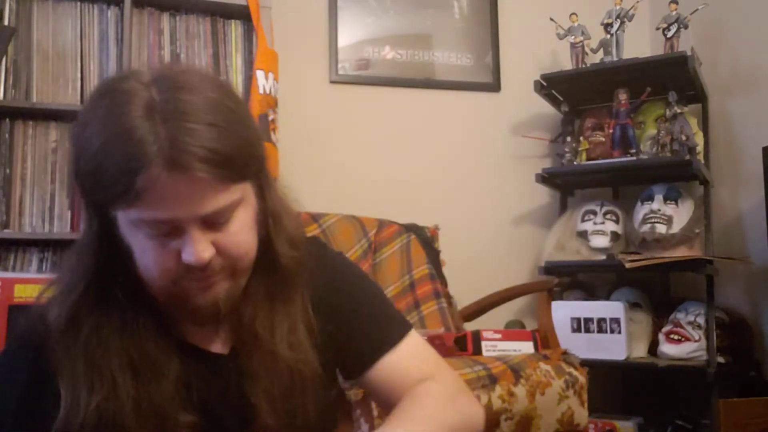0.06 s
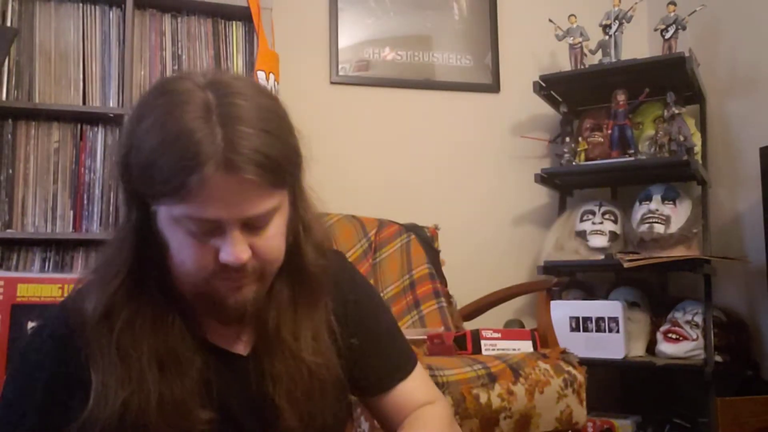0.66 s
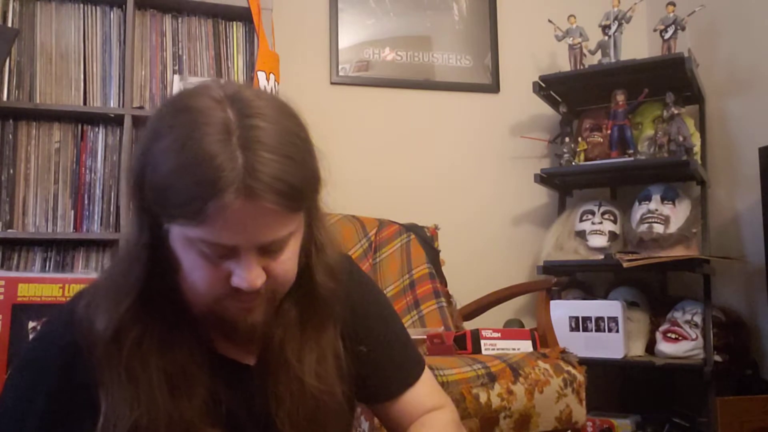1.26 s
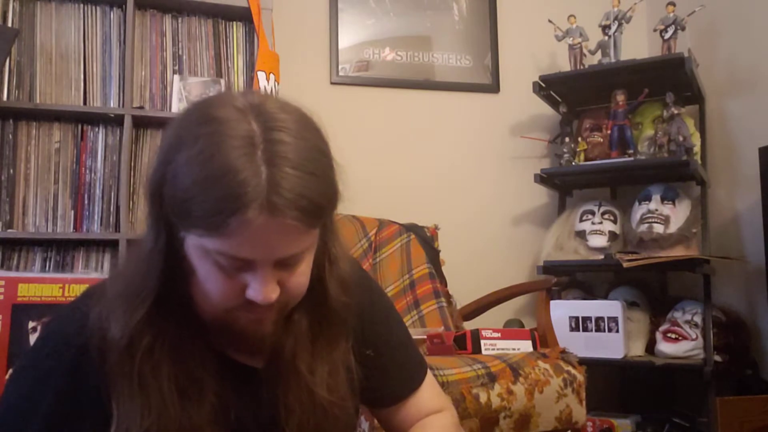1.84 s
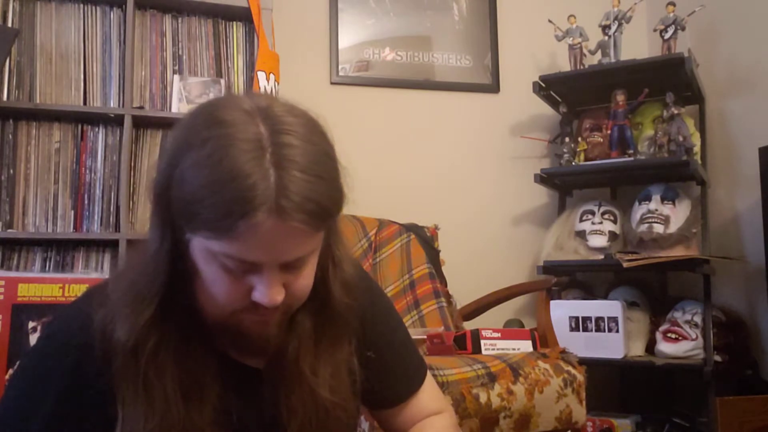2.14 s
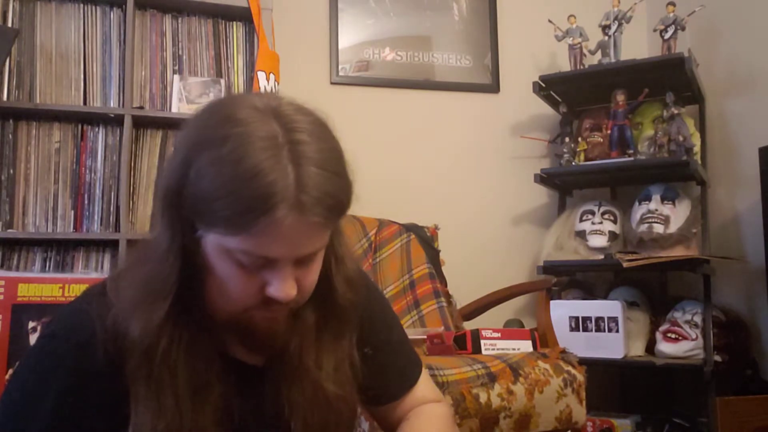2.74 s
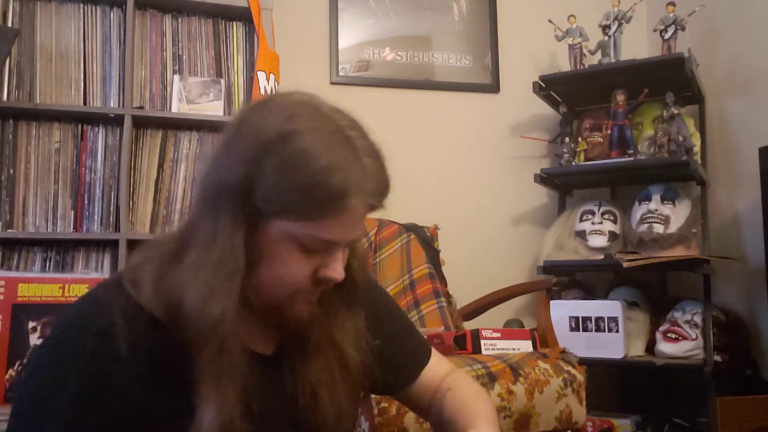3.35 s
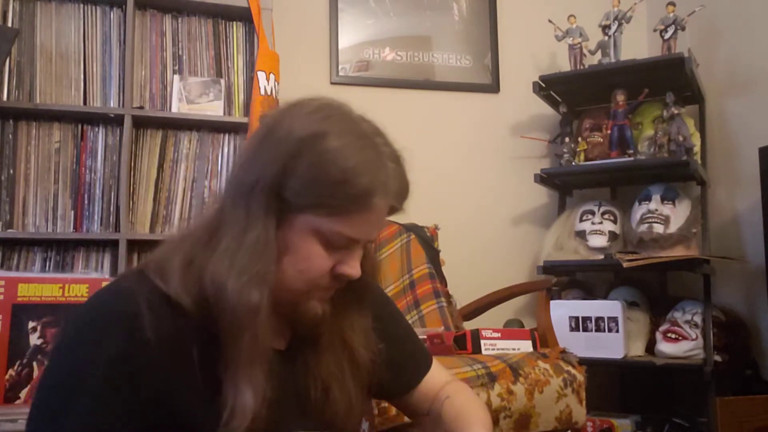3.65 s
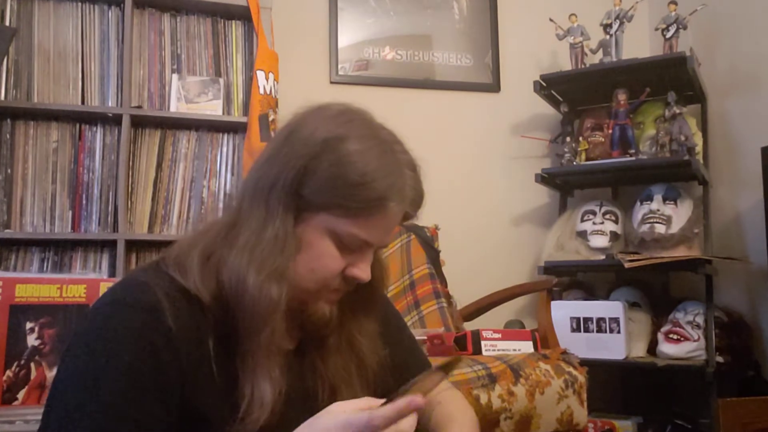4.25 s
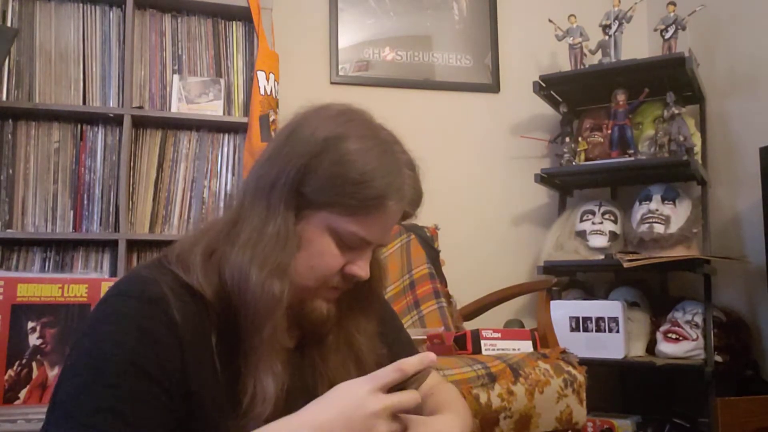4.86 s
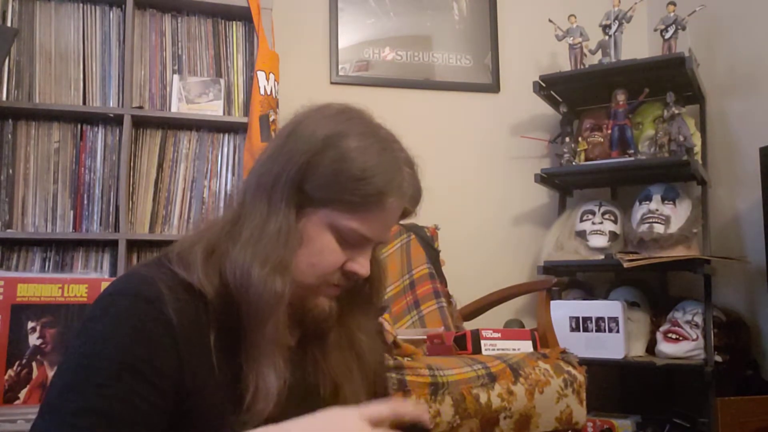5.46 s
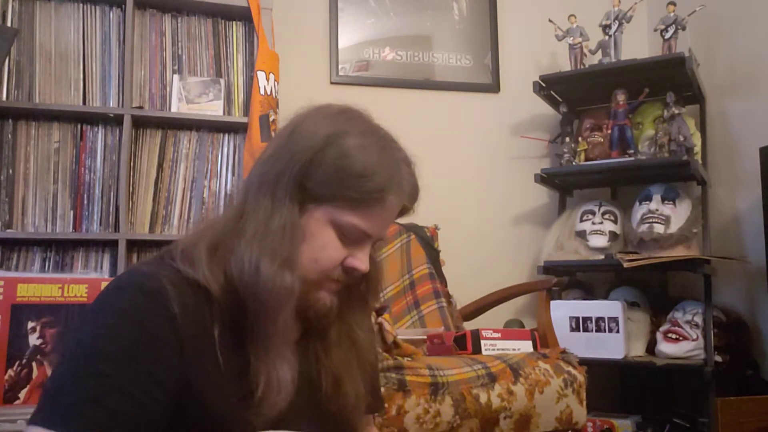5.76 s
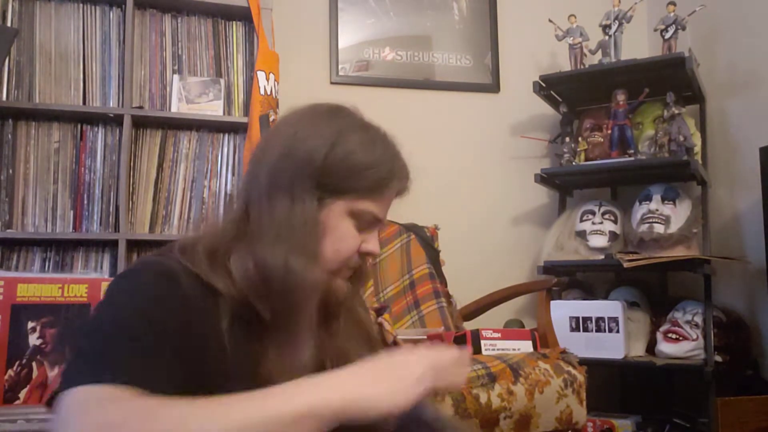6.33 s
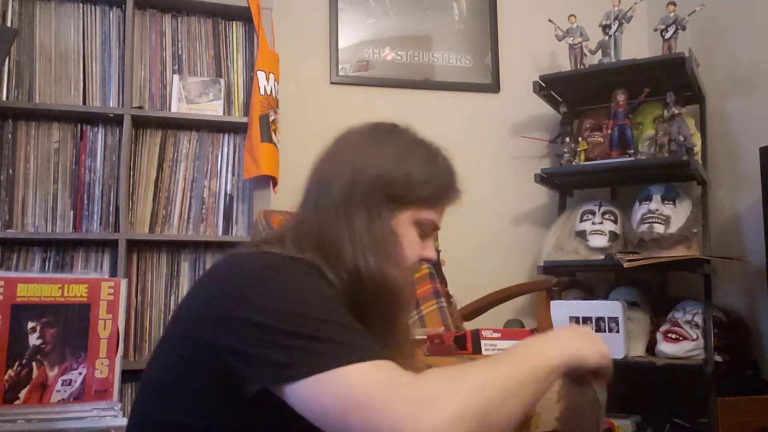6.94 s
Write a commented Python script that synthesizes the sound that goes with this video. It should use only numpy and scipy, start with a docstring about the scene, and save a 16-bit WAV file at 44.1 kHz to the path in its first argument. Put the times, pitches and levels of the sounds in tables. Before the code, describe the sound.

Paper rubs quietly near the microphone as a small vinyl disc slips from its sleeve, while a muffled engine drones outside and fades. Scattered snaps and taps follow, each with a short room echo. The disc gives its loudest click as a second engine approaches. Denser rustling ends the handling while that engine drops to a low idle, over steady rumble and faint hiss.

```python
"""A small vinyl record is slid out of its paper sleeve in a living room, with traffic behind the wall.
First the paper rubs and the disc glides out, while an engine drones and fades by 2 s.
Then fingers turn the disc: paper crinkles, the rim sings faintly and the near walls echo each tick.
From 4 s a second engine comes near, and the disc gives its loudest knock.
Last, the disc is laid aside in a run of rustles while that engine settles to idle."""
import sys
import numpy as np
from scipy import signal
from scipy.fft import rfft, irfft, next_fast_len
from scipy.io import wavfile
from scipy.ndimage import map_coordinates

SR = 44100
rng = np.random.default_rng(int(sys.argv[2]) if len(sys.argv) > 2 else 0)


def to_wav(s):
    """Save 16-bit WAV."""
    ch = np.atleast_2d(s).T  # columns
    pcm = np.round(np.clip(ch, -1, 1) * 32767)  # PCM
    wavfile.write(sys.argv[1], SR, pcm.astype(np.int16))


N = 308700  # 7 s

# Tone colours, that is, how strong each pitch is: pitch_hz, level_db
RUMBLE_TONE = [(20, -27.5), (35, -20.5), (48, -13.5), (59, 5), (70, -6), (85, -7), (105, -6), (135, -13.5),
               (165, -30), (210, -15), (300, -57.5)]
TYRE_TONE = [(130, -9), (180, -3), (215, -2), (232, 1), (250, 6.5), (280, -7), (350, -3.5), (450, -11.5),
             (540, -9.5), (590, -9), (650, -14.5), (750, -21), (1100, -25), (2000, -46)]
HISS_TONE = [(150, -3), (300, 18), (450, -6.5), (700, -0.5), (1200, -6), (2500, -6.5), (4000, -9.5),
             (5200, -3.5), (6800, 1), (7600, -3.5), (8400, -21), (10000, -17), (12000, -9), (15800, -9)]
PAPER_TONE = [(260, -61), (450, -3), (624, 2.5), (1070, -4.5), (1220, -12.5), (1370, -6), (1880, -10.5),
              (2090, -9.5), (2770, -3.5), (3310, -4), (4870, 0.5), (6370, 0), (8710, -11), (14200, -7.5),
              (15800, -12)]
HOLLOW_TONE = [(200, -9), (450, 3), (720, 13.5), (1000, -20), (1400, 3.5), (2000, -51), (4000, -12)]  # the sleeve's belly
SNAP_TONE = [(80, -39), (200, 1), (300, -2.5), (440, -4.5), (650, -3), (950, -7), (1500, -2.5), (2800, -4),
             (5000, 3), (6500, 2.5), (8500, -5.5), (12000, -7), (16000, -14)]
# Vehicles going by: nearest_s, half_width_s, tyre_db
PASSES = [(.85, 1.107, -62), (5.5, 0.61, -60.5)]
# The engine that fades: time_s, firing_hz, level_db
FIRST_ENGINE = [(0.0, 101.6, -41.5), (0.13, 101.5, -41.5), (0.27, 101.5, -38.5), (0.436, 101.5, -45),
                (1.016, 101.6, -48.5), (1.262, 103.4, -55.5), (1.332, 102.9, -62.5), (1.658, 103.1, -57),
                (1.8, 101.5, -77)]
# Its higher tones: times_firing_rate, relative_db
OVERTONES = [(2.489, -4.5), (3.48, -9.5), (5.8, -12.5)]
# The engine that comes near: time_s, lowest_tone_db, third_harmonic_db
SECOND_ENGINE = [(3.9, -80, -74.5), (4.11, -57, -60.5), (5.04, -60.5, -62.5), (5.23, -43, -58),
                 (5.66, -40, -59), (5.89, -54.5, -64), (5.97, -46.5, -64.5), (6.17, -42.5, -63),
                 (6.32, -43, -86), (6.44, -41.5, -69), (6.94, -44, -92), (7.0, -51, -77)]
# Echoes off the near walls: delay_s, left_gain, right_gain
WALL_ECHOES = [(.0035, .25, .1), (.0088, 0.38, -.3), (.0132, 0.074, .2), (.0136, 0.062, .35),
               (.024, .2, -.2)]
# How long the room takes to fade by 60 dB: pitch_hz, fade_s
ROOM_FADE = [(200, 0.28), (800, 0.22), (2000, 0.31), (5500, 0.28), (14000, 0.25)]
# Extra leftward lean of the handling sounds: pitch_hz, left_minus_right_db
LEFT_LEAN = [(500, -0.2), (2000, 2.2), (4000, -1.3), (8000, 3), (12000, -1.5)]
# Where disc and sleeve ring together: pitch_hz, width_hz, strength_db
RESONANCES = [(675, 270, -2), (1050, 120, -6), (1390, 91, -7.5), (2150, 320, -5.5), (2754, 420, 1.5),
              (3590, 250, -5), (4480, 2000, -9.5), (5050, 1700, -15.5)]
# Paper rubbing paper: start_s, attack_s, length_s, level_db, top_relative_db, body_relative_db
STROKES = [(0.108, 0.067, 0.081, -72.5, 16.5, -4), (0.242, 0.03, 0.054, -65, 2, -16),
           (.775, 0.062, 0.16, -68, 1, -12), (0.935, .06, 0.23, -77, -1, -3),
           (1.254, 0.028, 0.074, -64, -7, 4.5), (1.325, 0.072, 0.29, -68, -14, -2),
           (2.305, 0.014, 0.049, -65.5, -6, 0.5), (2.372, 0.063, 0.19, -71, 5, -13),
           (2.535, 0.048, 0.094, -60.5, -4, -5), (2.638, 0.025, 0.24, -72, 3, -12),
           (3.002, 0.041, 0.074, -61, -2.5, -6), (3.113, .06, 0.1, -71, 1, -7.5),
           (3.283, .012, 0.036, -58.5, 1, -39), (3.388, 0.059, 0.074, -60, 3.5, -2.5),
           (4.03, .025, .04, -75, -2, -2), (4.228, 0.027, 0.085, -66, -8, 2),
           (4.368, .05, 0.12, -64, -3, -10), (4.57, 0.048, 0.27, -78.5, -5, -5),
           (4.808, 0.064, 0.1, -67, -6.5, -0.5), (5.06, 0.11, 0.19, -64, -2.5, -0.5),
           (5.239, 0.071, 0.075, -53.5, 1, -4), (5.404, 0.047, 0.11, -58, 6, -11),
           (5.503, 0.069, 0.12, -53, 2.5, -12), (5.617, 0.047, 0.14, -54.5, -0.5, -3.5),
           (5.717, 0.076, 0.098, -50, 5, -14.5), (5.809, 0.028, 0.029, -56, 1, 1),
           (5.86, 0.035, 0.11, -62.5, 2.5, -8.5), (5.968, 0.045, 0.069, -52, 4.5, -14),
           (6.029, .03, 0.037, -59, -17, -1.5), (6.111, 0.047, 0.071, -66, 4, -10),
           (6.355, 0.032, 0.064, -60.5, -1, -9.5), (6.417, 0.039, 0.048, -54, -3.5, -4),
           (6.464, .04, 0.044, -50.5, -4.5, -5), (6.512, .04, 0.045, -63.5, 6.5, -16),
           (6.63, .06, 0.11, -76, 1, -5)]
# Rubs in the sleeve's pocket: a hand scuffs the sleeve near 0.2 s, then the disc slides along it twice: #
# start_s, attack_s, length_s, release_s, level_db, first_hz, last_hz, hollow_relative_db
GLIDES = [(0.204, 0.071, 0.14, 0.083, -64, 1940, 2140, -9),
          (0.962, 0.42, 0.45, 0.25, -61.5, 5670, 3570, -6.5),
          (5.43, .04, .21, 0.084, -59.5, 3900, 2270, -8.5)]
# The rim rubbing the paper: start_s, length_s, level_db
RIM_RUBS = [(2.614, 0.19, -73.5), (3.004, 0.06, -67.5)]
# Paper snaps and disc taps: time_s, level_db, pitch_hz, knock_relative_db, top_relative_db, room_db
CONTACTS = [(.589, -28.5, 4900, -17.5, -1, 0), (0.5931, -24.5, 7200, -28, -1, 4.5),
            (0.795, -35, 6200, -17, -11, 4), (.9769, -29, 5800, -23, -17, 6),
            (1.0482, -25.5, 5900, -42, -21, 5), (1.4511, -26, 3800, -6, -36, 3),
            (1.7796, -33, 5884, -6, -1, 3), (2.324, -35, 6400, -3.5, -29, 1.5),
            (2.4285, -32.5, 3230, -10, -6, 5), (2.548, -29, 6200, -11, -15, 4),
            (2.5678, -27.5, 6100, -3.5, -2.5, 1.5), (2.591, -32.5, 5615, 1, -3, 8),
            (2.6709, -29, 4770, -13, -9, -2), (3.036, -26.5, 6800, -7.5, -6, 7),
            (3.2809, -25, 5200, -16, -2, 5), (3.2874, -26, 4770, -16.5, -2.5, 8),
            (3.3937, -24.5, 4330, -29, -5.5, 2), (3.4014, -31, 4200, -3, -9, 9),
            (3.454, -21.5, 3640, -5, -4, -2), (3.64, -40.5, 5350, -4.5, -17, 4.5),
            (4.051, -34.5, 4800, -9.5, 2.5, 13), (4.2247, -24, 5100, -4.5, -4.5, 7.5),
            (4.3392, -14.5, 3600, -4.5, -11.5, 5), (4.3514, -17, 4400, -9, -22, 1),
            (4.362, -26.5, 2800, -19, -16, -5), (4.5227, -22.5, 3600, 1, -18, 9),
            (4.532, -28.5, 1100, 2.5, -21, 5), (5.1146, -34, 1300, 12, -22, 8),
            (5.125, -36.5, 700, 9, -12, 1), (5.3209, -20.5, 3580, -9, -2, 6),
            (5.3788, -29.5, 3800, -1, -6, 3), (6.3525, -43.5, 2780, 1, -4, 0)]

STROKE_FALL_S = 0.048  # a rub fades by 20 dB in this time
TIME_S = np.arange(N) / SR


def amp(db):
    """Turn decibels into a gain."""
    return 10 ** (np.asarray(db) / 20)


def unit(x):
    """Scale a sound to an average power of 1."""
    return x / np.sqrt(np.mean(x ** 2) + 1e-20)


def along(points, hz):
    """Look up a table's value at any pitch."""
    pitches, values = np.transpose(points)
    return np.interp(np.log(hz + 1), np.log(pitches + 1), values)


def curves(rows):
    """Turn each column after the time into one value per sample."""
    times, *columns = np.transpose(rows)
    return [np.interp(TIME_S, times, column) for column in columns]


def wobble(rate):
    """A smooth curve through `rate` random points a second."""
    return map_coordinates(rng.standard_normal(int(N * rate / SR) + 4), [TIME_S * rate])


def filtered(x, response):
    """Colour a sound with the gain that `response` gives each pitch."""
    size = next_fast_len(N + 8192)
    return irfft(rfft(x, size) * response(np.fft.rfftfreq(size, 1 / SR)), size)[..., :N]


def registers(hz, edges):
    """Split the pitches softly into bands below, between and above the edges."""
    below = [1 / (1 + (hz / edge) ** 12) for edge in edges]
    return np.diff([0 * hz, *below, 1 + 0 * hz], axis=0)


def panned(x, left_db):
    """Tip a sound towards the left."""
    return x * amp(np.array([[.5], [-.5]]) * left_db)


def spread(mid, side, hz, wide_hz=430):
    """Sound from all around: left and right are alike in the bass, unrelated in the treble."""
    side = side * hz / np.hypot(hz, wide_hz)
    return np.array([mid + side, mid - side])


def noise(tone, left_db):
    """Wide stereo noise with a given tone colour."""
    hz = np.fft.rfftfreq(N, 1 / SR)
    pair = spread(*rfft(rng.standard_normal((2, N))), hz) * amp(along(tone, hz))
    return unit(panned(irfft(pair, N), left_db))


def passing(nearest_s, half_width_s, db):
    """A vehicle swells as it comes near and fades behind the houses."""
    return amp(db) / (1 + np.abs((TIME_S - nearest_s) / half_width_s) ** 2.9)


def earshot(rows, fade_s=.25):
    """An engine fades in before its first row and out after its last."""
    outside_s = np.abs(TIME_S - np.clip(TIME_S, rows[0][0], rows[-1][0]))
    return amp(-20 * outside_s / fade_s)


def background():
    """Street rumble grows with engines and traffic; muffled tyres pass over a faint, steady hiss."""
    traffic = np.sqrt(sum(passing(*vehicle) ** 2 for vehicle in PASSES))
    effort = earshot(FIRST_ENGINE) * amp(curves(FIRST_ENGINE)[1])
    effort += earshot(SECOND_ENGINE) * amp(curves(SECOND_ENGINE)[0])
    steady, moving = amp(-58.5), amp(0.5) * np.sqrt(effort * traffic)
    rumble = np.hypot(steady, moving) * noise(RUMBLE_TONE, left_db=4.5)
    tyres = traffic * amp(1.5 * wobble(6)) * noise(TYRE_TONE, left_db=3.5)
    return rumble + tyres + amp(-73.5) * noise(HISS_TONE, left_db=5.5)


def firing_phase(hz):
    """One turn per engine firing, at a slightly unsteady rate."""
    return 2 * np.pi * (np.cumsum(hz * (1 + .003 * wobble(8))) / SR + rng.random())


def hum(phase, db, waver_db):
    """One engine tone, wavering as the vehicle moves."""
    return np.sqrt(2) * np.sin(phase) * amp(db + waver_db * wobble(14))


def first_engine():
    """A low drone passes the wall; higher tones swell with the first vehicle's tyres."""
    firing_hz, db = curves(FIRST_ENGINE)
    phase = firing_phase(firing_hz)
    drone = earshot(FIRST_ENGINE) * hum(phase, db, waver_db=1.0)
    for multiple, relative_db in OVERTONES:
        overtone = hum(multiple * phase + 0.9 * wobble(12), relative_db - 2.5, waver_db=3.0)
        drone += passing(*PASSES[0]) * overtone
    return panned(drone, left_db=2.1)


def second_engine(cruise_hz=70.75, idle_hz=60.05, slows_at_s=5.7, slowing_s=0.1223):
    """An engine drops to idle; only its three lowest harmonics pass the wall."""
    db, third_db = curves(SECOND_ENGINE)
    firing_hz = idle_hz + (cruise_hz - idle_hz) / (1 + np.exp((TIME_S - slows_at_s) / slowing_s))
    phase = firing_phase(firing_hz)
    drone = hum(phase, db, waver_db=2.1)
    drone += hum(2 * phase + wobble(10), db - 29, waver_db=0.0)
    third = hum(3 * phase + 0.9 * wobble(13), third_db, waver_db=1.5)
    return earshot(SECOND_ENGINE) * (panned(drone, left_db=1.1) + panned(third, left_db=3.5))


def room(tail_db, build_s=0.0058, wall_shift=.12):
    """The room's answer to a click: direct sound, wall echoes and a short, blurred tail."""
    hz, t, spectra = signal.stft(rng.standard_normal((2, SR // 3)), SR, nperseg=256)
    fade = amp(-60 * t / along(ROOM_FADE, hz)[:, None])
    tail = signal.istft(spread(*spectra, hz[:, None]) * fade, SR, nperseg=256)[1]
    tail *= 1 - np.exp(-(np.arange(tail.shape[1]) / SR / build_s) ** 2)
    answer = amp(tail_db) * tail / np.linalg.norm(tail[0])
    answer[[0, 1], rng.integers(0, 4, size=2)] += 1  # direct sound
    for delay_s, left, right in WALL_ECHOES:
        answer[:, round(delay_s * np.exp(wall_shift * rng.uniform(-1, 1)) * SR)] += left, right
    return answer / np.linalg.norm(answer[0])


def in_room(x, tail_db, pieces=56):
    """The hands keep moving, so each moment meets new echoes."""
    hop = N // pieces + 1
    window = signal.windows.cosine(2 * hop) ** 1.2
    x, out = np.pad(x, (hop, 2 * hop)), np.zeros((2, N + 2 * SR))
    for start in range(0, N, hop):
        heard = signal.fftconvolve([x[start:start + 2 * hop] * window], room(tail_db), axes=1)
        out[:, start:start + heard.shape[1]] += heard
    return out[:, hop:hop + N]


def stroke(start_s, attack_s, length_s, release_s):
    """A hand's speed: it rises smoothly, holds, then falls 20 dB per release time."""
    t = TIME_S - start_s
    rise = np.sin(np.pi / 2 * np.clip(t / attack_s, 0, 1)) ** 2
    return rise * amp(-20 * np.maximum(t - length_s, 0) / release_s)


def friction(slips_per_s, spread_db, hiss):
    """Paper fibres catch and let go: tiny, uneven slips over a smooth hiss."""
    slips = (rng.random(N) < slips_per_s / SR) * rng.choice([-1, 1], N)
    sizes = amp(spread_db * np.minimum(rng.exponential(size=N), 3))
    return unit(unit(slips * sizes) + hiss * rng.standard_normal(N))


def disc_ring(hz, depth):
    """Disc and sleeve bend most easily at certain pitches, which come out louder."""
    peaks = sum(amp(db) / (1 + (2 * (hz - pitch) / width) ** 2) for pitch, width, db in RESONANCES)
    return 1 + depth * peaks


def rim_song(rim_hz=2770, half_width_hz=150, attack_s=0.035):
    """Rubbing makes the disc's rim sing faintly at one pitch."""
    level = sum(amp(db) * stroke(start, attack_s, length, STROKE_FALL_S)
                for start, length, db in RIM_RUBS)
    peak = lambda hz: 1 / (1 + ((hz - rim_hz) / half_width_hz) ** 2)
    return level * unit(filtered(rng.standard_normal(N), peak))


def rustle():
    """Paper rubs on paper: a taut sheet is crisp, a slack pocket is hollow."""
    slips = friction(slips_per_s=700, spread_db=6.0, hiss=1.0)
    slips *= amp(2.35 * wobble(45))  # uneven finger pressure
    colour = lambda hz: amp(along(PAPER_TONE, hz)) * disc_ring(hz, 0.13) * registers(hz, (2000, 8200))
    body, middle, top = map(unit, filtered(slips, colour))
    out = np.zeros(N)
    for start, attack, length, db, top_db, body_db in STROKES:
        rub = middle + amp(top_db) * top + amp(body_db) * body
        out += amp(db) * stroke(start, attack, length, STROKE_FALL_S) * rub
    return out


def glide(settle_s=0.1):
    """The pitch of the sleeve's pocket moves as a hand scuffs the sleeve or the disc slides along it."""
    level, hollow, pocket_hz = np.zeros(N), np.zeros(N), np.ones(N)
    for start, attack, length, release, db, first_hz, last_hz, hollow_db in GLIDES:
        speed = amp(db) * stroke(start, attack, length, release)
        level += speed
        hollow += amp(hollow_db) * speed
        sweep_hz = last_hz + (first_hz - last_hz) * np.exp(-np.abs(TIME_S - start) / settle_s)
        pocket_hz = np.where(TIME_S < start, pocket_hz, sweep_hz)
    slips = friction(slips_per_s=700, spread_db=3.5, hiss=1.7)
    out = hollow * unit(filtered(slips, lambda hz: amp(along(HOLLOW_TONE, hz))))
    for band_hz in np.geomspace(1700, 5900, num=8):  # these bands take over in turn
        width_hz = 950 * (band_hz / 3000) ** 1.6
        sheet = lambda hz: 0.22 * (band_hz / 3000) ** 3 * hz / (hz + 1500) / (1 + (hz / 6500) ** 4)
        pocket = lambda hz: 1 / (1 + ((hz - band_hz) / width_hz) ** 4)
        scrape = unit(filtered(slips, lambda hz: (sheet(hz) + pocket(hz)) * disc_ring(hz, 1.0)))
        share = np.exp(-(np.log(pocket_hz / band_hz) / 0.094) ** 2)
        out += level * share * scrape
    return out


def crinkles(count=6, first_s=.8, last_s=3.2, pitch_hz=4970):
    """Fingers make faint, random snaps in the sleeve: more rows like those of CONTACTS."""
    return [(first_s + (last_s - first_s) * when, -41 + 6 * (strength - .5),
             pitch_hz * 2 ** (pitch - .5), -14, -9, 1.5)
            for when, strength, pitch in rng.random((count, 3))]


def shortest_ring(gain):
    """The briefest ring that has this gain at each pitch (a minimum-phase filter)."""
    cepstrum = irfft(np.log(np.maximum(gain, 1e-6)))
    half = len(cepstrum) // 2
    cepstrum[1:half] *= 2
    cepstrum[half + 1:] = 0
    return irfft(np.exp(rfft(cepstrum)))


def clicks(size=2048, lead=400, rise_s=0.003, fall_s=0.015):
    """Each contact is a burst of slips that builds, lets go, rings the sheet and echoes in the room."""
    out = np.zeros((2, N + SR))
    t, hz = (np.arange(size) - lead) / SR, np.fft.rfftfreq(size, 1 / SR)
    bands = registers(hz, (1200, 2800, 8200)) * amp(along(SNAP_TONE, hz)) * disc_ring(hz, 0.89)
    for time_s, db, snap_hz, knock_db, top_db, room_db in CONTACTS + crinkles():
        pace = (snap_hz / 5000) ** 0.31  # a lower snap rises and falls more slowly
        envelope = amp(-60 * pace * np.maximum(t / fall_s, -t / rise_s))
        slips = rfft(rng.standard_normal(size) * envelope)
        burst = irfft(slips / (np.abs(slips) + 1e-9) ** 0.093)  # many slips even out the tone
        patch = 1 + 1 / (1 + (7 * (hz - snap_hz) / snap_hz) ** 2)  # the bent patch has its own pitch
        thud, knock, snap, top = map(unit, bands * patch)
        thud_db = 0.5 + 0.69 * knock_db  # the low thud grows with the knock
        gain = amp(thud_db) * thud + amp(knock_db) * knock + snap + amp(top_db) * top
        contact = signal.fftconvolve(burst / np.linalg.norm(burst), shortest_ring(gain))[:size]
        heard = signal.fftconvolve(contact[None], room(room_db), axes=1)
        start = round(time_s * SR) - lead
        out[:, start:start + heard.shape[1]] += amp(db) * heard
    return out[:, :N]


def scene():
    """Paper and disc, a little to the left, over the traffic and hiss."""
    handling = in_room(rustle() + glide() + rim_song(), tail_db=3.5) + clicks()
    handling = filtered(handling, lambda hz: panned(0.86, left_db=4 + along(LEFT_LEAN, hz)))
    return handling + first_engine() + second_engine() + background()


def record(dry):
    """Cut off the very highest treble."""
    return filtered(dry, lambda hz: hz < 15850)


dry = scene()
out = record(dry)
to_wav(out)
```